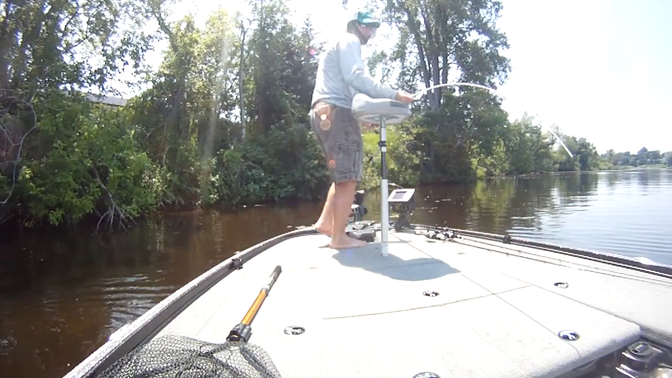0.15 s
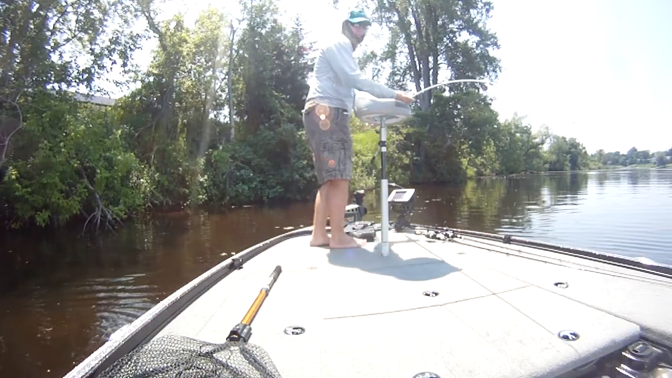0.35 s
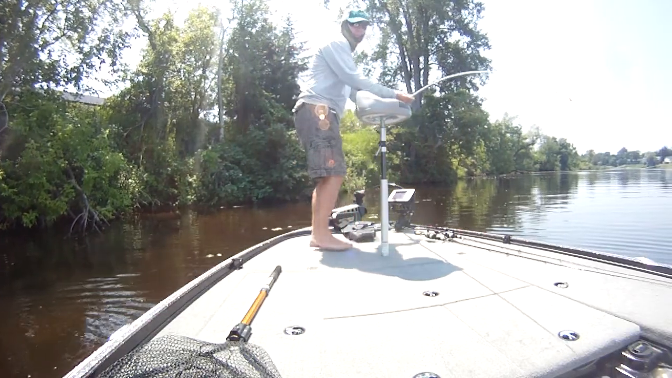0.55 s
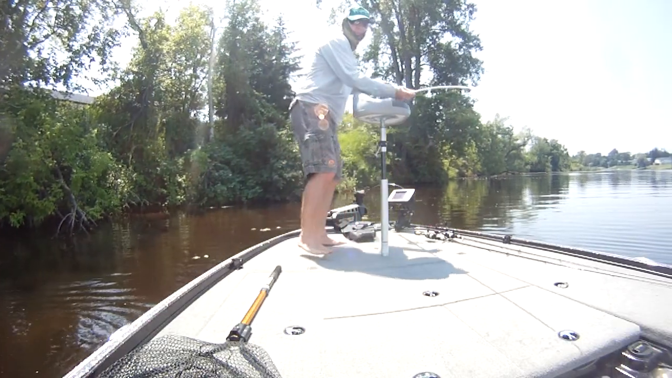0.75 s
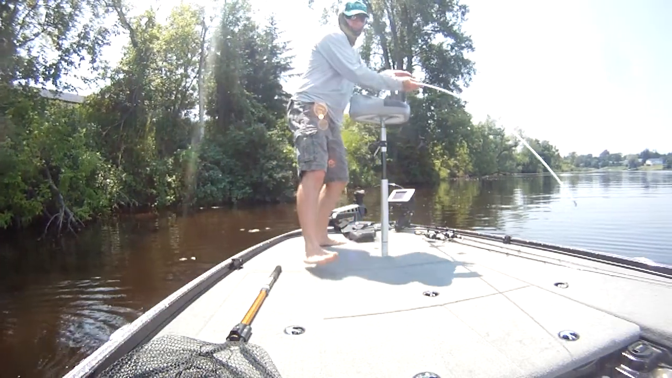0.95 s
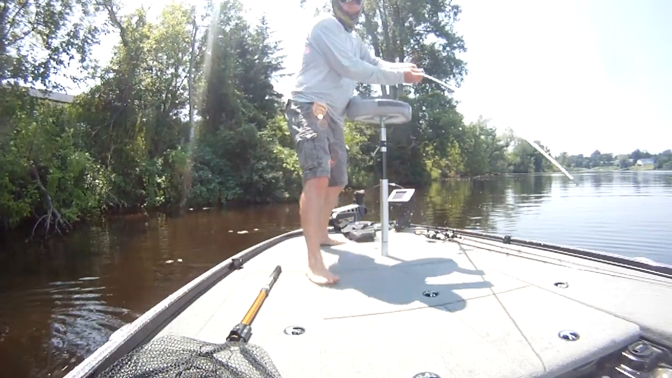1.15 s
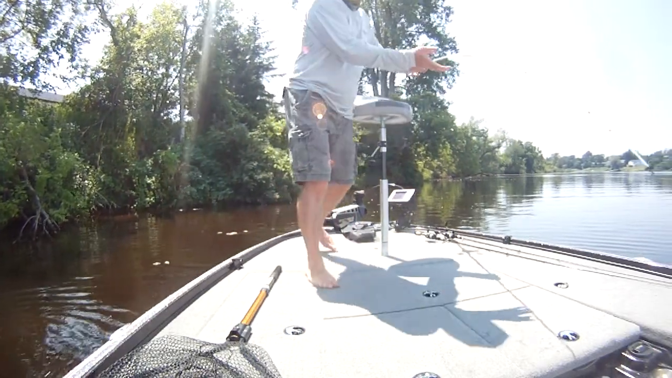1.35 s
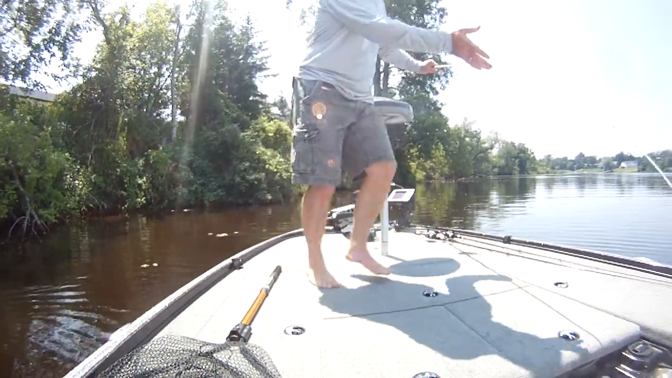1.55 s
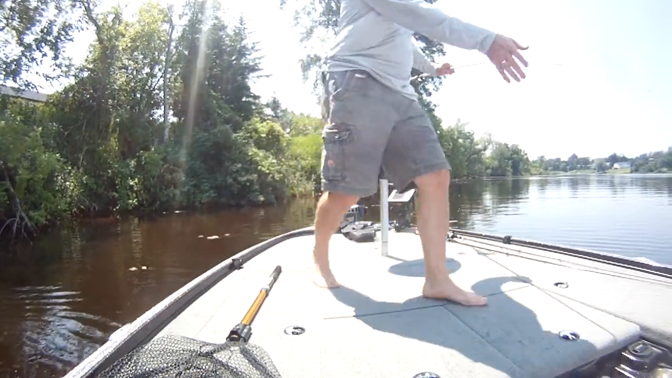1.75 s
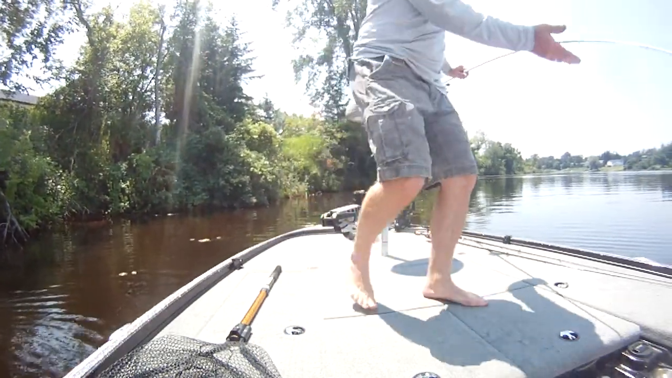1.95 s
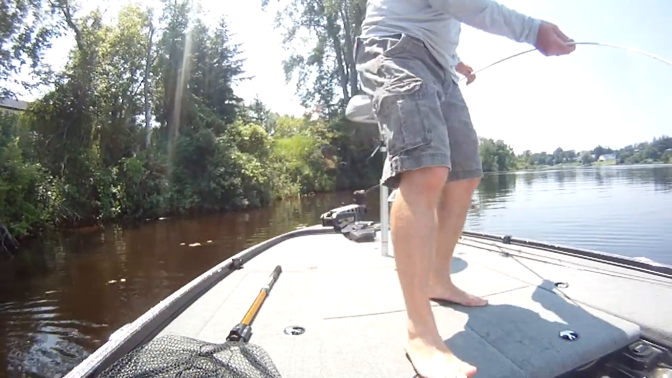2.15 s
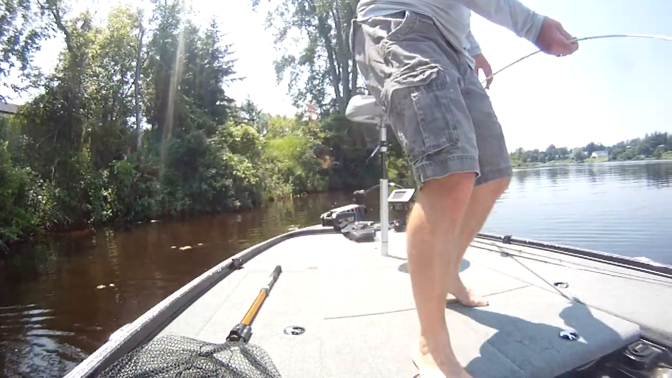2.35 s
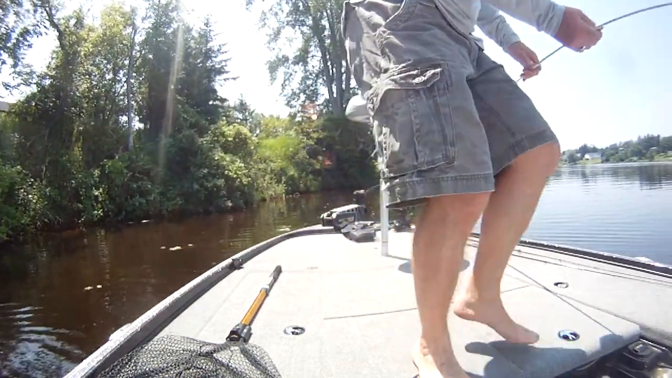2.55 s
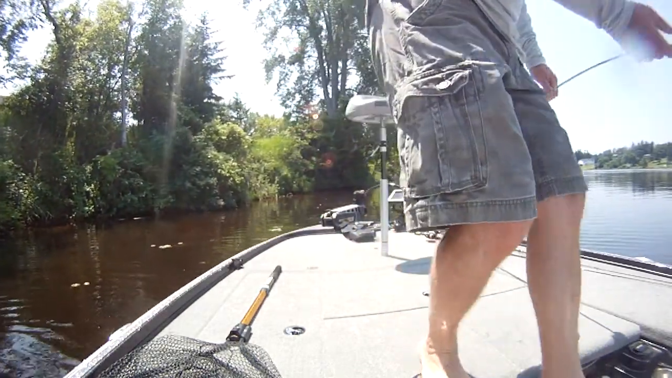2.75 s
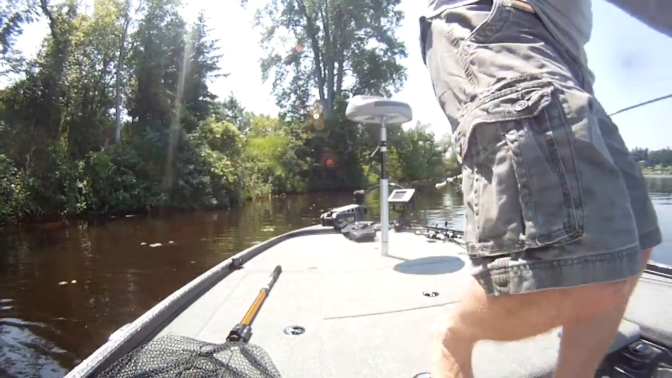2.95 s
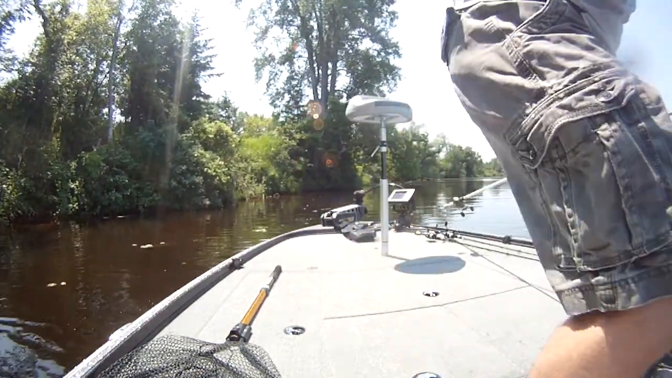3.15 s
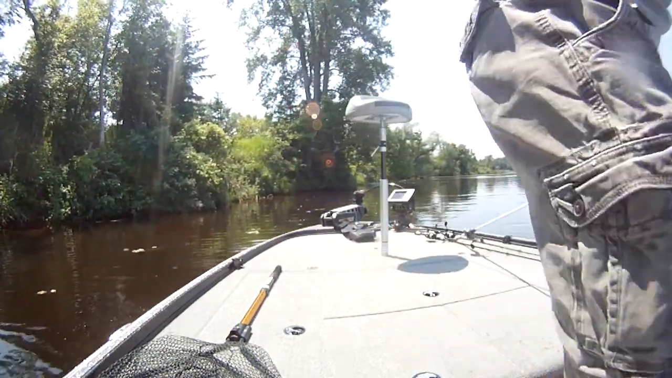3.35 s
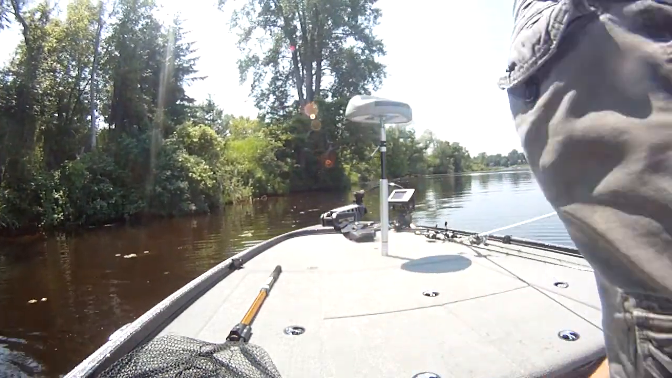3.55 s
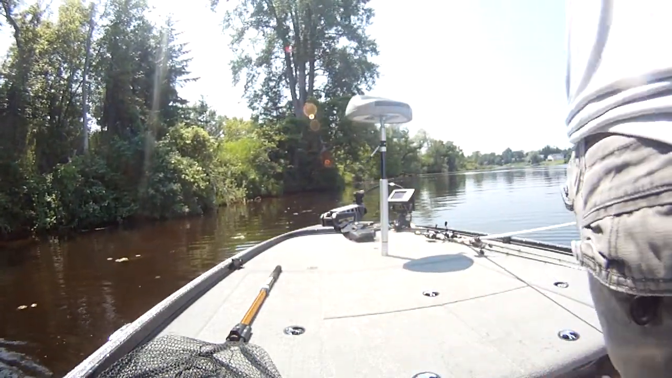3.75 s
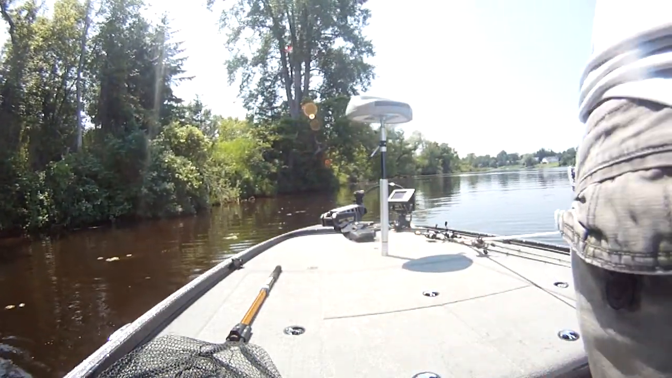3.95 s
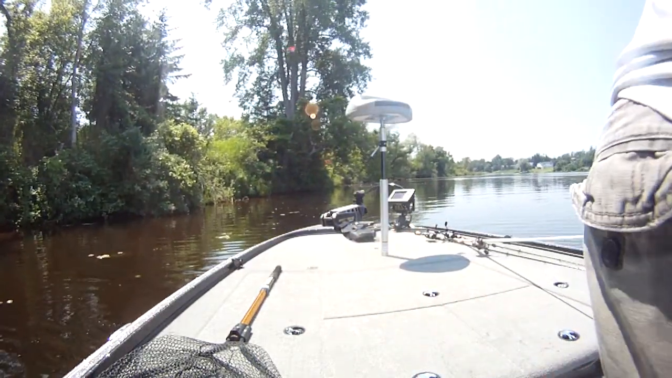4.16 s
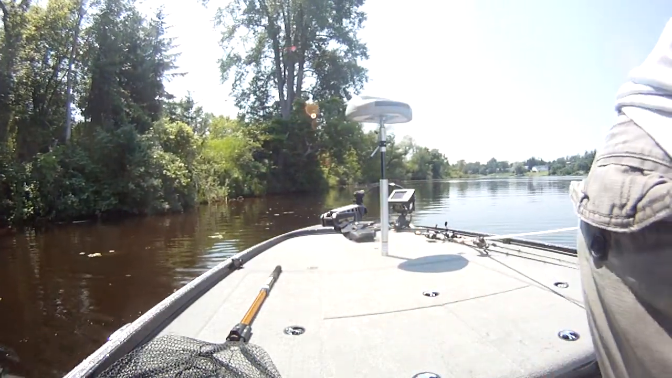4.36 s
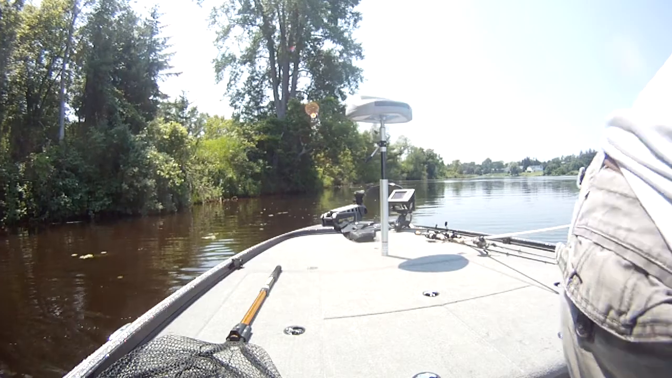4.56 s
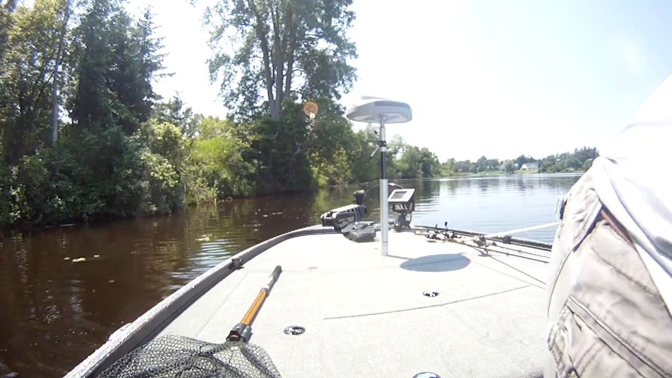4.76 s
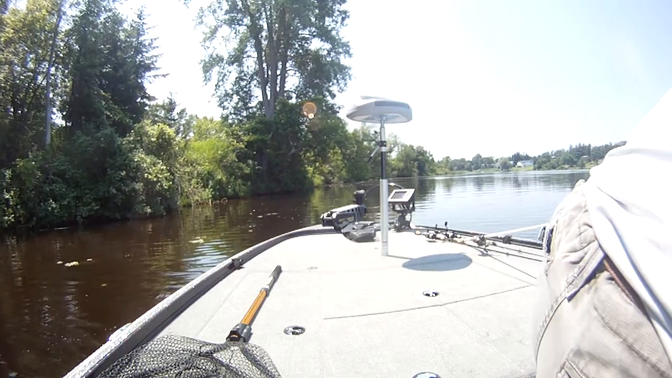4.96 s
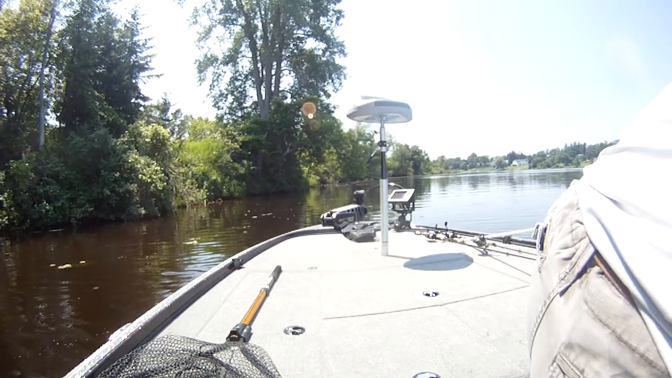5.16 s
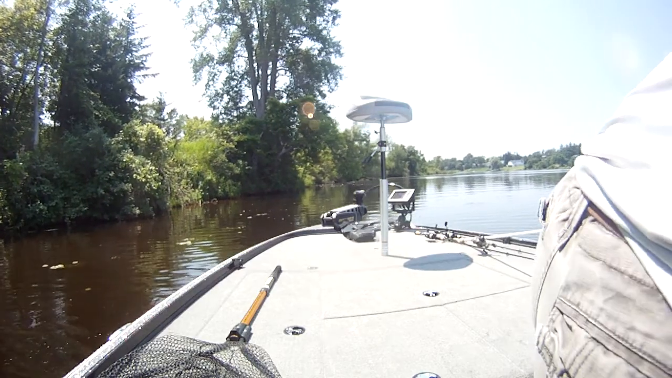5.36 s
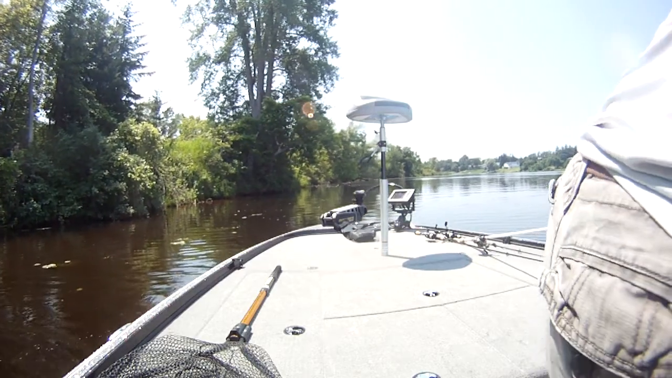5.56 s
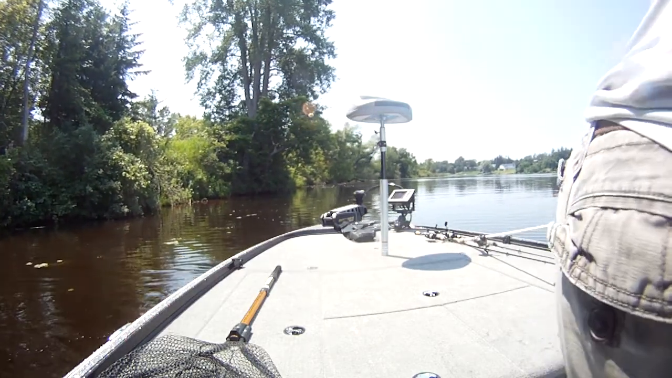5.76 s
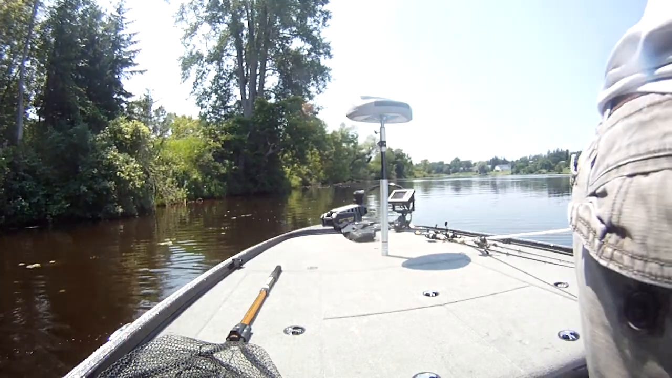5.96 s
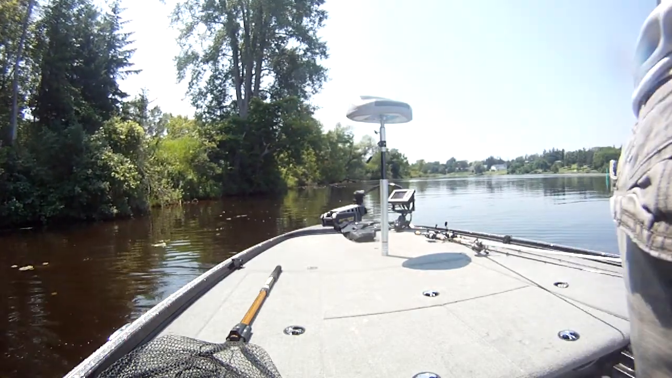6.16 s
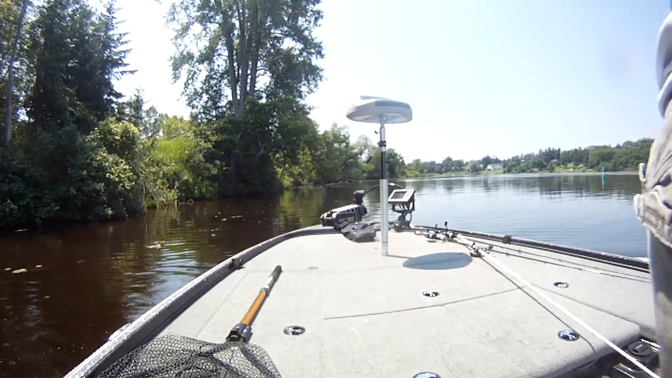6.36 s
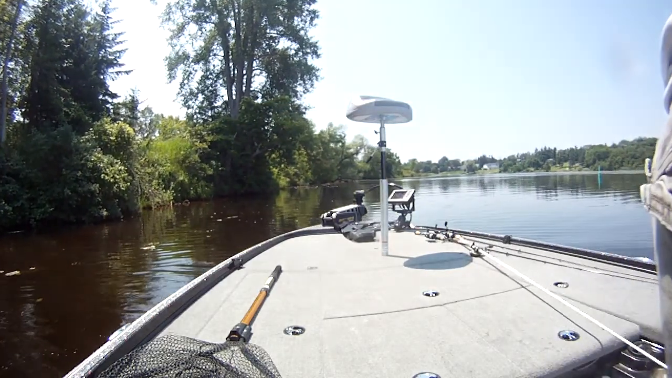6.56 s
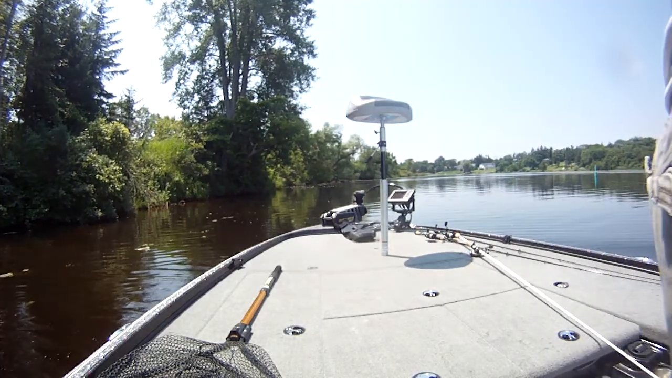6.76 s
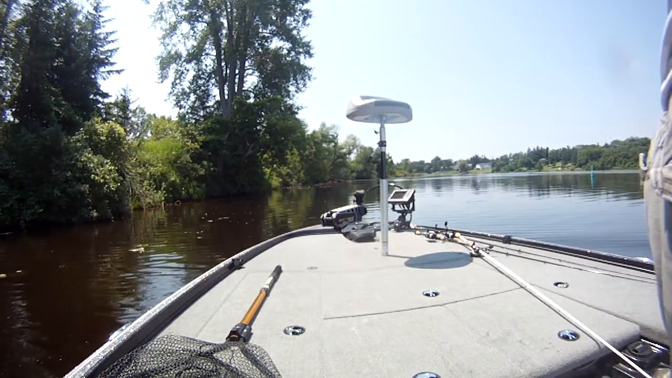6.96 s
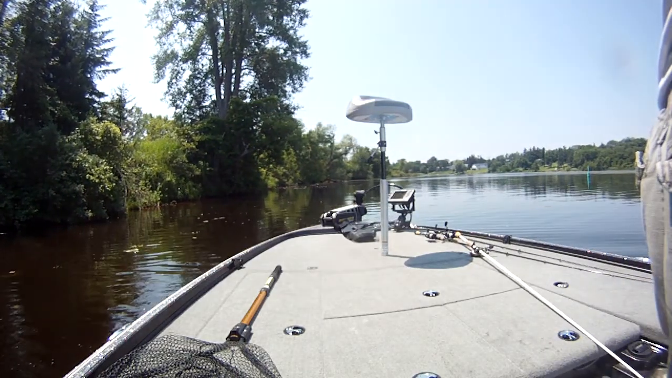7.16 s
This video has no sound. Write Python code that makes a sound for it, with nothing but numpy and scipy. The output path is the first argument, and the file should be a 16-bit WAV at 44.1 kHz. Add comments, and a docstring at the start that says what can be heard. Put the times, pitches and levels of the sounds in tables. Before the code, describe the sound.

Deep booming footsteps and hard hull knocks on a small boat, light plastic ticking between them, fading to muffled stillness before a final clatter.

```python
"""Footsteps on a hollow boat deck

Bare feet walk the deck of a small boat on still water; a camera in a closed housing sits on the hull.
Steps are decaying deck modes with a deep lurch under them; shaken modes hum on between.
Knocks and latch snaps are noise bursts through resonances; the mount sways and the housing ticks.
The camera holds each sample at a low rate, so the treble mirrors what lies below."""
import sys
import numpy as np
from scipy import signal
from scipy.fft import rfft, irfft, next_fast_len
from scipy.io import wavfile
from scipy.ndimage import uniform_filter1d

SR = 44100
rng = np.random.default_rng(int(sys.argv[2]) if len(sys.argv) > 2 else 0)


def generate_wav(sig):
    """Save sig (samples, or channels by samples) to the path in sys.argv[1] as 16-bit PCM at SR."""
    pcm = np.round(np.clip(np.atleast_2d(sig).T, -1, 1) * 32767).astype(np.int16)
    wavfile.write(sys.argv[1], SR, pcm)


def gain_from_decibels(decibels):
    """Convert decibel values to linear amplitude factors."""
    exponent = np.asarray(decibels, float) / 20
    return 10 ** exponent


N = 317961
TIME = np.arange(N) / SR
SWAY_HZ = 18.5

# Footfalls and thuds. Each row: start in seconds, level in dB, centre of the boom in Hz,
# lowest mode in dB, rise in seconds.
FOOTFALLS = [(0.138, -41, 162.5, -17, 0.023), (0.256, -22.5, 171.5, -18, 0.035),
             (0.895, -16.5, 178, -6.5, 0.02), (0.926, -10.5, 144.3, -22, 0.051),
             (1.061, -10, 166, -25.5, 0.035), (1.328, -12, 134.6, -26, 0.036), (1.626, -38, 147, -5, 0.029),
             (1.674, -35, 165, -29, 0.019), (1.787, -45.5, 152, -2.5, 0.017),
             (1.908, -37, 164.7, -21, 0.017), (2.078, -5, 160.5, -6.5, 0.0059),
             (2.112, -7.5, 150.4, -11, .018), (2.468, -43, 129, -9, 0.015), (2.554, -45, 180, -17, 0.023),
             (2.661, -31.5, 146, -17, 0.034), (2.72, -31.5, 144, -19, 0.019), (2.797, -35, 125, 9.5, 0.024),
             (2.842, -33, 130, 0.5, 0.016), (2.901, -14.5, 165, -16, 0.021), (3.08, -23, 168, -8.5, 0.011),
             (3.106, -30, 147, -17, .02), (3.362, -39, 173, -5.5, 0.026), (3.714, -21, 135, -14, 0.037),
             (3.796, -39, 149, -26, .025), (3.897, -41, 171, -4, 0.02), (4.125, -48.5, 150, -20, 0.0168),
             (4.189, -51, 137, -0.5, 0.016), (5.506, -49.5, 137, -17, .025), (5.737, -42.5, 181, -35, .02),
             (6.247, -39, 150, -30, 0.013), (6.306, -26.5, 162.6, -18, .022),
             (6.344, -22.5, 148, -16, .024), (6.394, -29.5, 158, 1.5, 0.0127),
             (6.435, -38, 125, -5, 0.0128), (6.495, -41, 139, -18, 0.014),
             (6.53, -39.5, 169.5, -1.5, 0.015), (6.699, -33, 185, -31, 0.015)]
# Modes of the hollow deck, deepest first. Each row: frequency in Hz, level in dB.
DECK_MODES = [(97, 1.5), (125, -4), (143, 2.5), (158, -14.5), (178, 3.5), (198, 0.5), (250, -14)]


def curve(rows):
    """Join (s, value) rows by straight lines."""
    return np.interp(TIME, *np.transpose(rows))


def shape(x, gain_at):
    """Weight the spectrum by a function of frequency."""
    size = next_fast_len(x.shape[-1])
    hz = np.maximum(np.fft.rfftfreq(size, 1 / SR), 1)
    return irfft(rfft(x, size) * gain_at(hz), size)[..., :N]


def unit(x):
    """Scale to rms 1."""
    return x / np.sqrt(np.mean(x ** 2))


def band(x, hz, width_hz):
    """Two-pole resonance, gain 1 at the centre."""
    return signal.lfilter(*signal.iirpeak(hz, hz / width_hz, SR), x)


def walk(rate_hz):
    """Slow random drift, rms 1: noise averaged twice over 1 / rate_hz."""
    k = int(SR / rate_hz)
    return unit(uniform_filter1d(uniform_filter1d(rng.standard_normal(N), k), k))


def add(out, s, x):
    """Mix x into out from time s on."""
    i = int(s * SR)
    out[i:i + len(x)] += x[:N - i]


def after(times_s, levels_db, rise_s, t60_s):
    """Envelope that swells at each event and dies away; events add in power."""
    kicks, t = np.zeros(N), TIME[:SR // 2]
    np.add.at(kicks, (np.array(times_s) * SR).astype(int), gain_from_decibels(np.array(levels_db)) ** 2)
    swell = np.minimum(t / rise_s, 1) * gain_from_decibels(-60 * t / t60_s)
    power = signal.fftconvolve(kicks, swell ** 2)[:N]
    return np.sqrt(np.abs(power))


def air():
    """Still air and water, muffled by the housing: steady shaped noise."""
    # Spectrum before scaling. Each row: frequency in Hz, density in dB per Hz (relative).
    spectrum = [(12, -54), (20, -4.5), (34, -7), (49, -8.5), (192, -10.5), (323, -17), (355, -14),
                (390, -17.5), (439, -18.5), (1530, -24), (5600, -30.5), (7280, -41), (12300, -120)]
    rms_db = -60
    hz, db = np.transpose(spectrum)
    steady = shape(rng.standard_normal(N), lambda f: gain_from_decibels(np.interp(np.log(f), np.log(hz), db)))
    return gain_from_decibels(rms_db) * unit(steady)


def strokes():
    """Rows (s, dB, lid dB) of all ticks: lone ones, evenly paced runs, and their faster-fading returns."""
    # Each row: time in seconds, level in dB, ring of the lid in dB.
    lone_ticks = [(0.2582, -47, 0), (0.3, -53, -4), (0.3183, -50, -7), (0.589, -52.5, -6),
                  (0.8966, -39.5, -1), (0.972, -55, -5), (0.983, -43.5, -21), (1.139, -54, -8),
                  (1.2213, -45, -18), (1.8366, -48.5, -5.5), (1.9774, -49, -13), (2.4826, -45.5, -7),
                  (2.5373, -47, -5), (2.6779, -47, -5.5), (2.7267, -53, -4), (2.9044, -55, -5),
                  (3.004, -47, -5.5), (3.0167, -46, -7.5), (3.82, -59, -9.5), (3.8903, -43, -4.5),
                  (4.0806, -61, -1), (3.9143, -43, -15), (5.612, -55.5, -29), (5.7084, -54.5, -7),
                  (5.738, -54, -5), (5.7995, -61, -1.5), (6.4613, -55, -5)]
    # Runs of even swings. Each row: first and last tick in seconds, first and last level in dB,
    # return stroke in dB relative to its tick.
    rattles = [(.3446, 0.449, -44.5, -47.5, -6.5), (1.0076, 1.059, -42.5, -42, -9),
               (1.114, 1.166, -54, -49, -26), (1.243, 1.4714, -41.5, -43, 1),
               (1.5428, 1.668, -45.5, -52.5, -1.5), (1.961, 2.0626, -48.5, -44, -14),
               (2.1163, 2.215, -47, -51, -1), (2.2789, 2.3235, -48.5, -48.5, -7),
               (2.392, 2.6107, -49.5, -45.5, -19), (2.7446, 2.8457, -46.5, -48, -9),
               (3.0447, 3.151, -41, -42.5, -1), (3.2068, 3.323, -43.5, -51.5, -4),
               (3.5427, 3.592, -50, -48.5, -29), (3.6574, 3.804, -54.5, -46, -20),
               (3.939, 4.102, -40.5, -48, -2), (4.1655, 4.2273, -51, -52, -24),
               (4.3486, 4.4093, -52, -61, -20), (4.5837, 4.6295, -52.5, -59, -24),
               (4.7654, 4.938, -54, -60, -22)]
    return_delay_s, return_fade = 0.0272, 2.8  # fade: extra dB per dB below the run's louder end
    strike_lid_db, return_lid_db = -5, -11.5
    rows = list(lone_ticks)
    for first_s, last_s, first_db, last_db, return_db in rattles:
        for share in np.linspace(0, 1, round((last_s - first_s) * SWAY_HZ) + 1):
            s = first_s + share * (last_s - first_s)
            db = first_db + share * (last_db - first_db)
            fade_db = return_fade * (db - max(first_db, last_db))
            rows.append((s, db, strike_lid_db))
            rows.append((s + return_delay_s, db + return_db + fade_db, return_lid_db))
    return rows


def sway():
    """The mount swings at a slow, wandering rate, widest at the hardest ticks; a weak octave skews it."""
    per_tick_db, rest_db = 1.5, -71.5
    rise_s, t60_s = 0.0074, 0.32
    phase = 2 * np.pi * np.cumsum(SWAY_HZ * (1 + 0.036 * walk(4.8))) / SR
    s, db = np.transpose(strokes())[:2]
    size = after(s, db + per_tick_db, rise_s, t60_s) + gain_from_decibels(rest_db)
    return size * np.sqrt(2) * (np.sin(phase) + gain_from_decibels(-18.0) * np.sin(2 * phase))


def ticks():
    """One end of the swing rings the lid and bounces once; the other pushes the opposite way, lid damped."""
    # Wall modes. Each row: frequency in Hz, level in dB, t60 in seconds, signed size of the first swing.
    housing = [(1500, -4.5, 0.0042, 1), (2200, 1, 0.0063, -0.97), (2700, -4.5, 0.018, 0.4),
               (3005, -3, 0.011, 0.58), (4236, -2.5, 0.011, 0.95), (4740, 1, 0.0063, -1.16),
               (5170, -2, 0.0062, -1)]
    lid_hz, lid_t60_s, lid_rise_s = 3580, 0.015, 0.00089
    scatter_db, detune_share, contact_s = 2.0, 0.012, 0.00085
    damped_below_db = -8
    strokes_all = strokes()
    out, t = np.zeros(N), TIME[:SR // 30]
    hz, mode_db, t60_s, sign = np.transpose(housing)[:, :, None]
    chance = rng.standard_normal((len(strokes_all), 2, len(housing), 1))
    contact = np.sin(np.pi / 2 * np.minimum(t / contact_s, 1)) ** 2
    lid = (1 - np.exp(-t / lid_rise_s)) * gain_from_decibels(-60 * t / lid_t60_s) * np.sin(2 * np.pi * lid_hz * t)
    for (s, db, lid_db), (detune, scatter) in zip(strokes_all, chance):
        decay = gain_from_decibels(mode_db + scatter_db * scatter - 60 * t / t60_s)
        walls = sign * decay * np.sin(2 * np.pi * hz * (1 + detune_share * detune) * t)
        tick = gain_from_decibels(db + 4.0) * contact * (walls.sum(axis=0) + gain_from_decibels(lid_db + 7.5) * lid)
        if lid_db < damped_below_db:
            add(out, s, -tick)
            continue
        add(out, s, tick)
        # harder swings rebound more, and sooner
        bounce_delay_s = 0.0064 * gain_from_decibels(-0.4 * (db + 44.5))
        bounce_db = -8 + 0.75 * (db + 37.5)
        add(out, s + bounce_delay_s, tick * gain_from_decibels(bounce_db))
    return out


def snaps():
    """A plastic latch snaps: a click and a short rattle behind it ring its resonances."""
    # Each row: start in seconds, peak in dB, rattle length in seconds.
    snap_events = [(6.3519, -24, 0.017), (6.3902, -27.5, 0.0081)]
    # Each row: frequency in Hz, width in Hz, level in dB.
    latch = [(2210, 55, 9.5), (2850, 300, -3), (3150, 390, 6), (3223, 89, -1.5), (3550, 85, 9),
             (5140, 340, 7)]
    out, t = np.zeros(N), TIME[:SR // 10]
    chance = rng.standard_normal((len(snap_events), len(t)))
    for (s, db, rattle_s), noise in zip(snap_events, chance):
        burst = noise * (np.exp(-t / 0.0055) + gain_from_decibels(-17) * (t < rattle_s))
        ring = np.zeros(len(t))
        for hz, width_hz, mode_db in latch:
            mode = band(band(burst, hz, width_hz), hz, 4 * width_hz)
            ring += gain_from_decibels(mode_db) * mode / np.sqrt(width_hz)
        add(out, s, gain_from_decibels(db) * ring / np.abs(ring).max())
    return out


def knocks():
    """Heels and gear strike the hull: bursts ring panels near the spot struck; upper panels die sooner."""
    # Each row: start in seconds, level in dB, brightest panel in Hz, panels under 500 Hz in dB,
    # t60 at 1 kHz in seconds (at least 0.01 is used).
    blows = [(0.256, -39, 1530, -8.5, 0.12), (0.8958, -23.5, 1810, -7, 0.053),
             (.904, -29.5, 1020, -1, 0.074), (0.926, -40, 1500, 10.5, 0.077), (.947, -35, 1500, -8, 0.065),
             (1.0687, -19, 1760, -7.5, 0.053), (1.079, -29.5, 950, -22, 0.077), (1.331, -56, 800, 21.5, .1),
             (1.339, -39, 2300, -7.5, 0.083), (1.914, -57, 800, 9.5, 0.071),
             (2.0841, -9.5, 2030, -6, 0.022), (2.087, -43.5, 800, 1, 0.16), (2.098, -32, 2310, -2, 0.039),
             (2.561, -54.5, 800, -13, .06), (2.584, -52, 1200, -6, 0.091), (2.659, -43, 2010, -27, 0.15),
             (2.693, -42, 2370, -20, 0.084), (2.711, -57, 800, 22.5, 0.041), (2.798, -46, 900, 17.5, 0.026),
             (2.87, -43, 2200, -21, 0.056), (2.901, -63, 800, 15, 0.066), (3.08, -54.5, 800, 18, 0.058),
             (3.16, -42.5, 2010, -19, 0.076), (5.648, -44, 2300, -7, .03), (6.239, -41.5, 1150, -12, 0.067),
             (6.250, -42, 860, -20, 0.031), (6.356, -46.5, 1210, 12.5, 0.081),
             (6.395, -50.5, 1200, -3, 0.11)]
    # Panels. Each row: frequency in Hz, width in Hz, level in dB.
    hull = [(254, 29, 5), (292, 42.6, 4.5), (513, 97, -4), (732, 75, 4), (800, 64, 10), (1060, 220, 10),
            (1200, 420, 2), (1500, 255, 4), (1813, 320, 3.5), (2040, 220, -1), (2730, 260, -5),
            (3180, 130, 1.5), (3900, 340, -19), (4840, 1700, 4)]
    out, t = np.zeros(N), TIME[:SR // 7]
    chance = rng.standard_normal((len(blows), len(t)))
    for (s, db, centre_hz, low_db, t60_s), noise in zip(blows, chance):
        for hz, width_hz, panel_db in hull:
            decay = gain_from_decibels(-60 * t / max(t60_s, 0.01) * (hz / 1000) ** 0.67)
            burst = noise * np.minimum(t / 0.001, 1) * decay
            # the first contact is one blow that the big low panels feel most
            burst[0] = 6.7 * 300 / hz
            share_db = low_db if hz < 500 else -16 * abs(np.log2(hz / centre_hz))
            gain = gain_from_decibels(db - 5.5 + panel_db + share_db) * np.sqrt(SR / width_hz / 10)
            add(out, s, gain * band(band(burst, hz, width_hz), hz, 3 * width_hz))
    return out


def hum():
    """Steady shaking keeps the broad deck modes sounding, unevenly; every step adds a shudder."""
    # The motor runs down, then shifting weight shakes the deck. Each row: time in seconds, level in dB.
    shaking = [(0.0, -41), (0.18, -58.5), (1.5, -55.5), (2.4, -62.5), (2.9, -47), (3.2, -56.5),
               (4.0, -66.5), (4.42, -79), (6.1, -82), (6.43, -38.5), (6.57, -60), (6.75, -45.5),
               (6.89, -41.5), (7.09, -48), (7.21, -56)]
    # Share of the two deepest modes, set by where the weight rests. Each row: time in seconds, gain in dB.
    deep_share = [(0.0, 4.5), (.5, 2.5), (6.45, -2), (6.7, -3), (7.21, -17)]
    shudder_db, shudder_rise_s, shudder_t60_s = -20, 0.023, 0.39
    modes = []
    for hz, db in DECK_MODES[:-1]:
        level = gain_from_decibels(db + 4.86 * walk(4.9))
        modes.append(level * unit(band(band(rng.standard_normal(N), hz, 29.0), hz, 41.0)))
    s, db = np.transpose(FOOTFALLS)[:2]
    level = gain_from_decibels(curve(shaking)) + after(s, db + shudder_db, shudder_rise_s, shudder_t60_s)
    return level * unit(gain_from_decibels(curve(deep_share)) * sum(modes[:2]) + sum(modes[2:]))


def lurch():
    """A foot that rolls on slowly tips the hull the most: a deep swing that sinks in pitch."""
    from_hz, to_hz, glide_s, t60_s = 45, 22, 0.035, 0.7
    out, t = np.zeros(N), TIME[:SR // 2]
    hz = to_hz + (from_hz - to_hz) * np.exp(-t / glide_s)
    swing = np.sin(2 * np.pi * np.cumsum(hz) / SR) * gain_from_decibels(-60 * t / t60_s)
    for s, db, _, _, rise_s in FOOTFALLS:
        add(out, s, gain_from_decibels(db - 19) * (rise_s / 0.06) ** 1.1 * swing)
    return out


def steps():
    """Each foot rolls its weight on so the modes swell, then ring out; the spot picks the modes."""
    t60_at_150hz_s, lag_cycles = 0.2, 0.854  # deep modes take longest to start
    detune_share, phase_spread_rad = 0.022, 0.25
    out, t = np.zeros(N), TIME[:SR // 3]
    hz, mode_db = np.transpose(DECK_MODES)[:, :, None]
    chance = rng.standard_normal((len(FOOTFALLS), 2, len(DECK_MODES), 1))
    for (s, db, centre_hz, low_db, rise_s), (detune, turn) in zip(FOOTFALLS, chance):
        octaves_off = np.minimum(np.abs(np.log2(hz / centre_hz)), 0.45)
        upper = gain_from_decibels(mode_db - 71.0 * octaves_off)[1:]
        gains = np.vstack([[gain_from_decibels(low_db)], upper / upper.sum()])
        swell = np.minimum(t * hz / lag_cycles, 1) * gain_from_decibels(-7 * np.maximum(1 - t / rise_s, 0))
        ring = gain_from_decibels(-60 * np.maximum(t - rise_s, 0) / t60_at_150hz_s * (hz / 150) ** 0.5)
        phase = 2 * np.pi * hz * (1 + detune_share * detune) * (t - rise_s)
        waves = np.cos(phase + phase_spread_rad * turn)
        add(out, s, gain_from_decibels(db) * (swell * gains * ring * waves).sum(axis=0))
    return out


def scene():
    """One microphone inside the housing feeds both channels."""
    boom = shape(steps(), lambda f: 1 / (1 + (65 / f) ** 4))
    mono = boom + hum() + sway() + lurch() + ticks() + knocks() + snaps() + air()
    return np.tile(mono, (2, 1))


def low_pass(x):
    """Removes everything above the highest recorded frequency."""
    return signal.sosfilt(signal.butter(12, 16500, fs=SR, output="sos"), x)


def record(dry):
    """A low-pass, then each sample is held: the band is mirrored round the sample rate under a sinc slope."""
    hold_hz, guard_hz, top_hz = 12000, 5230, 15150
    hiss_db, hiss_side_db = -79, -71
    mid, side = rng.standard_normal((2, N))
    # hiss of opposite sign in the two channels
    dry = dry + gain_from_decibels(hiss_side_db) * band(side, 1500.0, 6300.0) * np.array([[1], [-1]])
    guarded = signal.sosfilt(signal.cheby1(6, 0.5, guard_hz, fs=SR, output="sos"), dry)
    mirrored = guarded * (1 + 2 * np.cos(2 * np.pi * hold_hz * TIME))
    held = shape(mirrored, lambda f: np.sinc(f / hold_hz)) + gain_from_decibels(hiss_db) * mid
    finished = shape(held, lambda f: 1 / (1 + (f / top_hz) ** 64))
    return low_pass(finished)


dry = scene()
out = record(dry)
generate_wav(out)
```